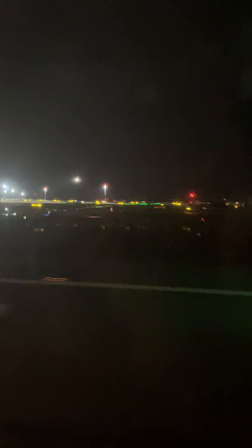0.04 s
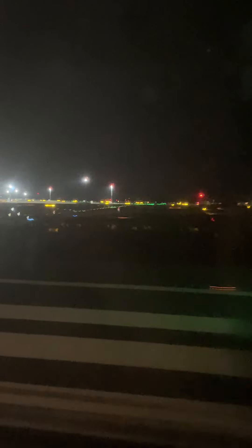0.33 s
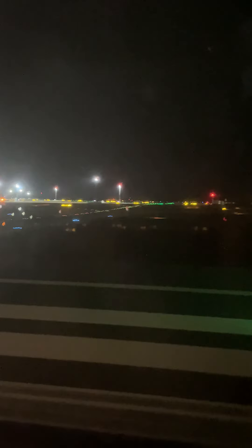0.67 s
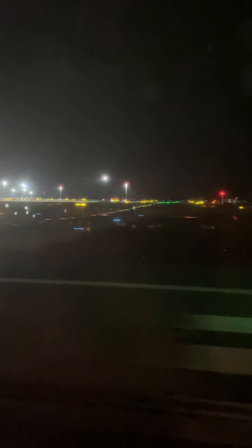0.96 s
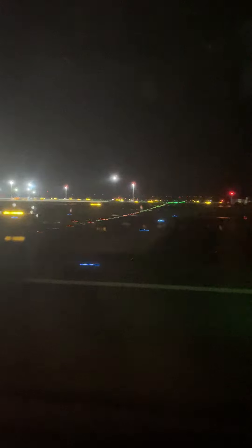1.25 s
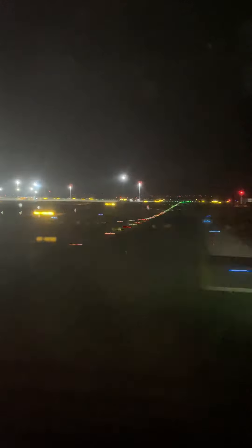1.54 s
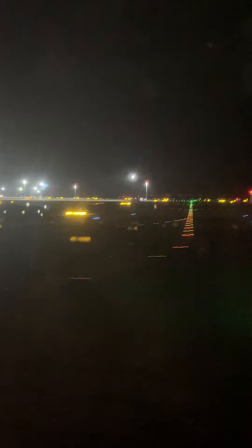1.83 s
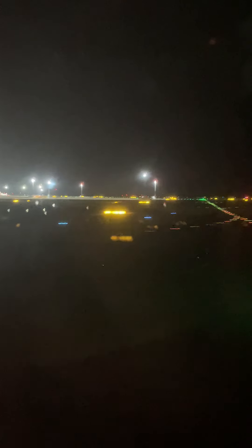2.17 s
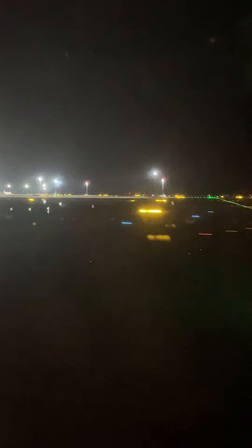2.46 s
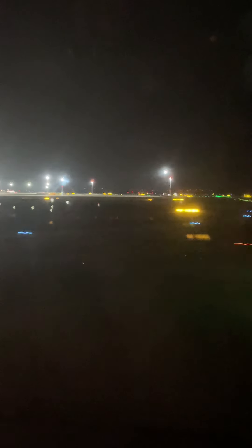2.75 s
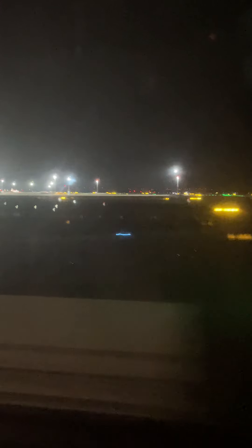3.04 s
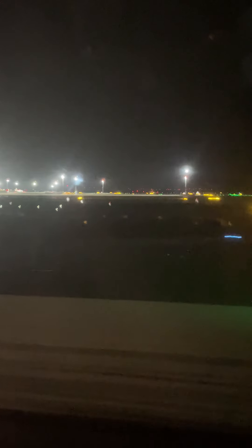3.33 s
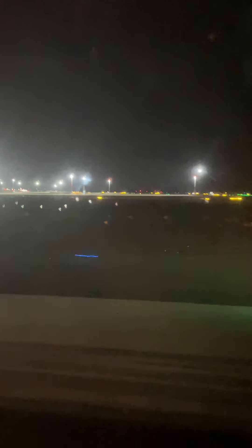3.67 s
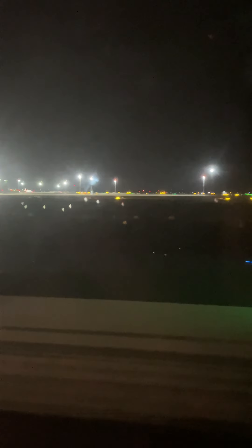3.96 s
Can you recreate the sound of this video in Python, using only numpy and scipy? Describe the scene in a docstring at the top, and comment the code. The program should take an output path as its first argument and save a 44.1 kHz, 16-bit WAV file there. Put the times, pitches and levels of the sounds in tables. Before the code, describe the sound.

Jet engines roar at takeoff power with a steady, gently beating buzz, heard from a window seat inside the cabin. Underneath, the wheels rumble and drone along the runway, while plastic trim rattles faintly a few times.

```python
"""Takeoff roll from a window seat.

Inside a jet gathering speed on the runway at takeoff thrust, a microphone at each ear. Two fans,
slightly out of step, draw a beating buzz-saw chord on the multiples of their shaft rate. Below the
seat the wheels drone on a slowly rising pitch and the undercarriage rumbles. The cabin trim rattles
briefly; behind it all lie the roar of the exhaust and the hiss of the cabin air."""
import sys
import numpy as np
from scipy import signal
from scipy.fft import rfft, irfft
from scipy.io import wavfile
from scipy.ndimage import uniform_filter1d, minimum_filter1d

SR = 44100
rng = np.random.default_rng(int(sys.argv[2]) if len(sys.argv) > 2 else 0)


def materialize(psi):
    """Save the field psi as 16-bit PCM at rate SR to the path in sys.argv[1].

    A 1-D psi becomes a single channel; in a 2-D psi each row is a channel.
    """
    bounded = np.clip(np.atleast_2d(psi).T, -1, 1)
    quanta = np.round(bounded * 32767).astype(np.int16)
    wavfile.write(sys.argv[1], SR, quanta)


N = 176400

# Buzz-saw tones at the seat. Each row: multiple of the shaft rate, relative level at mid-roll in dB
# on the left, the same on the right, growth in dB per second.
BUZZ_SAW_TONES = [(3, -29.5, -30.5, 0), (4, -18.0, -22.0, 0), (5, -39.0, -47.5, 0), (6, -30.0, -34.0, 0),
                  (7, -28.0, -32.0, 0), (8, -54.5, -45.5, 0), (9, -40.0, -39.0, 0), (10, -32.0, -38.0, 0),
                  (11, -40.5, -41.0, 0), (12, -50.0, -51.0, 0.3), (13, -45.0, -52.0, 0.3),
                  (14, -36.5, -40.5, 0), (15, -49.0, -47.5, 0), (16, -46.0, -49.0, 0.9),
                  (17, -48.5, -46.0, -1.6), (18, -49.5, -47.5, 0), (19, -53.0, -49.5, 0.4),
                  (20, -42.0, -43.5, 0), (21, -42.0, -44.5, 0.5), (22, -57.0, -51.5, -1.0),
                  (23, -58.5, -50.0, 1.0), (24, -49.0, -47.0, 0), (25, -58.5, -55.0, 0.9),
                  (26, -53.5, -51.0, 0.7), (27, -56.5, -56.5, -1.5), (28, -63.0, -61.5, 0),
                  (29, -47.5, -47.0, 1.5), (30, -41.0, -56.0, 1.0), (31, -52.0, -59.0, 3.5),
                  (32, -54.5, -57.0, 1.1), (33, -61.5, -59.0, -1.4), (34, -57.0, -59.5, 2.5),
                  (35, -48.5, -50.5, -1.1), (36, -40.5, -39.5, -0.5), (37, -56.5, -59.0, -1.9),
                  (38, -57.0, -64.0, 1.4), (39, -54.0, -59.0, 2.4), (40, -57.5, -58.0, 1.0),
                  (41, -55.0, -60.0, -1.0), (42, -54.5, -56.0, 0), (43, -63.0, -64.5, 1.6),
                  (44, -57.0, -62.5, -2.0), (45, -56.0, -59.5, -0.9), (46, -59.0, -66.5, -2.0),
                  (47, -64.0, -62.0, -2.2), (49, -69.5, -68.5, -2.3), (50, -63.0, -66.5, 2.1),
                  (51, -65.5, -66.0, -0.5), (52, -73.0, -68.5, 2.5), (53, -66.5, -68.5, 1.8),
                  (55, -68.0, -66.0, 0), (56, -63.5, -64.0, -1.1)]
# The far engine. Each row: multiple of the shaft rate, level against the near engine in dB.
FAR_ENGINE = [(1, -12), (4, -7), (6, -2.5), (7, -22), (14, -18), (20, -12), (21, -8), (24, -17), (30, -19),
              (35, -10), (36, -18), (39, -8), (45, -13)]
# Fan tones across the two microphones. Each row: frequency in Hz, lead of the left in radians.
FAN_LEAD = [(70, -.5), (280, -.16), (450, 1.5), (1000, 1.2), (1150, -.3), (1280, .8), (1550, 1.1),
            (1700, 0), (2030, -1.3), (2100, .2), (2230, -.8), (2520, 1.2), (3200, 1.3), (4000, 1)]
# Three fan whines swell and ease. Each row: time in seconds, gain in dB.
SWELL_30TH = [(0, -1), (.6, -2), (1.2, .5), (2, .5), (3, -.5), (4, -2)]
SWELL_36TH = [(0, -1.5), (.9, -.7), (1.3, 1.2), (2, 0), (2.55, 2), (2.9, -1), (3.35, -1.5), (3.6, .5),
              (3.72, -2.5), (4, -1.5)]
SWELL_50TH = [(0, 0), (1.2, 2), (2.5, -7), (2.9, -1), (3.5, 2.5), (4, 2)]
# Turbulence makes tones fade and return, the weak ones most. Each row: tone level in dB, depth 0-1.
TURBULENT_FADING = [(-60, .4), (-48, .2), (-40, .08)]
# Engine hum. Each row: frequency in Hz, level in dB.
HUM_TONES = [(194, -21.5), (632, -46)]
# Drone on three multiples of the wheel rate. Each row: time in seconds, level in dB.
WHEEL_4TH = [(0, -27), (.3, -24), (.45, -15), (.8, -14.5), (1.3, -11.7), (1.8, -12.3), (2.15, -26),
             (2.45, -16), (2.8, -20), (3.3, -13), (3.65, -17.5), (4, -25)]
WHEEL_5TH = [(0, -37), (.3, -15), (.7, -27), (1.8, -25.5), (2.3, -18.5), (3.0, -27), (3.6, -26.5),
             (3.9, -9.5)]
WHEEL_7TH = [(0, -25), (.8, -21.5), (1.5, -29.5), (2.25, -21), (3.0, -27.5), (4, -21)]
# Trim rattles. Each row: start in seconds, level in dB, decay in seconds, brightness in dB per octave.
RATTLES = [(.824, -55, .005, 6), (1.364, -42, 0.016, 2), (1.377, -41, .012, -14), (1.386, -49, .007, -5),
           (3.423, -43, 0.0032, 2), (3.577, -47, 0.016, -17.5)]
# Spectra of the trim, undercarriage, exhaust through the fuselage and cabin air.
# Each row: frequency in Hz, relative noise density in dB.
RATTLE_SPECTRUM = [(1500, -7.5), (2800, 6), (5000, 8), (7300, 3), (9500, -2), (12000, -2), (15000, -14)]
RUMBLE_SPECTRUM = [(18, -60), (30, -50.5), (42, -34.5), (60, -38.5), (85, -34), (115, -36.5), (135, -39.5),
                   (175, -37.5), (212, -35.5), (250, -41), (278, -40)]
EXHAUST_SPECTRUM = [(310, -44), (380, -47.5), (460, -52), (505, -53), (530, -43.5), (570, -57.5),
                    (680, -55), (850, -60.5), (1100, -67.5), (1500, -70.5), (1900, -77.5), (2100, -74),
                    (2300, -76.5), (2520, -75), (2650, -79), (3200, -83.5)]
AIR_SPECTRUM = [(3900, -87.5), (4400, -87.5), (5000, -87.5), (5800, -96), (7200, -89), (8500, -105.5),
                (11500, -97.5), (13000, -109), (15500, -115)]
# The cabin's sound field at the microphones. Each row: frequency in Hz, left minus right in dB,
# coherence 0-1, lead of the left in radians.
CABIN_FIELD = [(50, -2.8, .99, -.04), (80, -2.2, .92, .18), (120, -1.2, .87, .3), (250, 1.8, .82, .05),
               (400, 1.5, .5, .25), (550, .6, .35, 1.2), (900, .6, .5, .8), (1500, 0, .33, .2),
               (2500, .8, .38, 0), (4500, .3, .08, -1.0), (6500, 1.0, .3, -1.7), (8500, .5, .5, -2.0),
               (11000, 0, .7, -.3)]


def fans():
    """Shock waves from unequal blades repeat once a turn; two engines beat, faster on higher multiples."""
    shaft_hz, wander_hz, mismatch_hz = 70.0, .012, .215
    in_step_s, mid_roll_s = 1.42, 2.0
    turns = np.cumsum(shaft_hz + wander_hz * drift(.51)) / SR
    slip_turns = mismatch_hz * (seconds() - in_step_s)  # the far engine turns slightly faster
    swells = {30: SWELL_30TH, 36: SWELL_36TH, 50: SWELL_50TH}
    # Faint upper multiples fall away by .22 dB each, scattered by 2 dB on either side.
    faint_tones = [(k, *(-71.5 - .22 * (k - 59) + rng.normal(0, 2.0, 2)), 0) for k in range(59, 96)]
    out = np.zeros((2, N))
    for multiple, left_db, right_db, db_per_s in list(BUZZ_SAW_TONES) + faint_tones:
        k = round(multiple)
        far_gain = from_db(np.interp(k, *np.transpose(FAR_ENGINE)))
        beat = (1 + far_gain * np.exp(2j * np.pi * k * slip_turns)) / np.sqrt(1 + far_gain ** 2)
        swell_db = db_per_s * (seconds() - mid_roll_s) + (in_time(swells[k]) if k in swells else 0)
        fade_depth = np.interp(max(left_db, right_db), *np.transpose(TURBULENT_FADING))
        fade = tone(0, flutter=fade_depth, rate_hz=1.6) / np.sqrt(2)
        wave = from_db(swell_db) * beat * fade * tone(k * turns, flutter=.11, rate_hz=9.0)
        lead = at_hz(FAN_LEAD, k * shaft_hz)[0]
        out[0] += from_db(left_db) * np.real(wave * np.exp(1j * lead))
        out[1] += from_db(right_db) * wave.real
    return from_db(-.06) * out


def engine_hum():
    """The engine's other turning parts hold their pitch and flutter in strength."""
    return sum(from_db(db) * at_microphones(tone(hz * seconds(), flutter=.73, rate_hz=11.0), hz)
               for hz, db in HUM_TONES)


def wheels():
    """Under the floor, uneven tyres drone on multiples of the wheel rate, which rises with speed."""
    start_hz, rise_hz_per_s = 13.75, 1.03
    turns = np.cumsum(start_hz + rise_hz_per_s * seconds()) / SR
    out = np.zeros((2, N))
    for k, levels in (4, WHEEL_4TH), (5, WHEEL_5TH), (7, WHEEL_7TH):
        drone = tone(k * turns, flutter=.07, rate_hz=2.5)
        out += from_db(in_time(levels)) * at_microphones(drone, k * start_hz)
    return out


def trim_rattles():
    """Loose plastic in the cabin chatters: short, grainy bursts, some bright and some dull."""
    attack_s, grain_db = .0022, 2.5
    hz = np.fft.rfftfreq(N, 1 / SR)
    octaves = np.log2(np.maximum(hz, RATTLE_SPECTRUM[0][0]))
    out = np.zeros((2, N))
    octaves = np.maximum(octaves, np.log2(RATTLE_SPECTRUM[1][0]))  # brightness tilts only the treble
    for start, db, decay_s, brightness in RATTLES:
        age = np.maximum(seconds() - start, 0)
        envelope = from_db(db) * np.minimum(age / attack_s, 1) * np.exp(-age / decay_s)
        colour = from_db(at_hz(RATTLE_SPECTRUM, hz)[0] + brightness * octaves)
        noise = irfft(rfft(rng.standard_normal((2, N))) * colour, N)
        noise = noise + .5 * noise[::-1]  # each side spills into the other microphone
        out += envelope * noise / noise.std()
    return out * from_db(grain_db * drift(200))


def rumble_roar_and_air():
    """The bed of the scene: undercarriage in the bass, exhaust in the middle, flickering air on top."""
    spectrum = list(RUMBLE_SPECTRUM) + list(EXHAUST_SPECTRUM) + list(AIR_SPECTRUM)
    rumble_top_hz, roar_top_hz, flicker_db = 290, 3600, .86
    rumble = from_db(2.5) * cabin_noise(spectrum, 12, rumble_top_hz)
    roar = from_db(-.5) * cabin_noise(spectrum, rumble_top_hz, roar_top_hz)
    air = from_db(-2 + flicker_db * drift(8)) * cabin_noise(spectrum, roar_top_hz, SR / 2)
    return rumble + roar + air


def cabin_noise(spectrum, low_hz, high_hz):
    """A band of noise, alike at both microphones in the bass and more diffuse above."""
    hz = np.fft.rfftfreq(N, 1 / SR)
    tilt_db, coherence, lead = at_hz(CABIN_FIELD, hz)
    shared, separate = rfft(rng.standard_normal((2, N)))
    left = shared * np.exp(1j * lead) * from_db(tilt_db / 2)
    right = (coherence * shared + np.sqrt(1 - coherence ** 2) * separate) * from_db(-tilt_db / 2)
    in_band = (hz >= low_hz) & (hz < high_hz)
    gain = from_db(at_hz(spectrum, hz)[0]) * np.sqrt(SR / 2) * in_band
    return irfft(gain * np.array([left, right]), N)


def at_microphones(wave, hz):
    """A complex tone in the cabin reaches each microphone with its own level and phase."""
    tilt_db, _, lead = at_hz(CABIN_FIELD, hz)
    return np.real([wave * from_db(tilt_db / 2) * np.exp(1j * lead), wave * from_db(-tilt_db / 2)])


def tone(turns, flutter, rate_hz):
    """A complex tone whose strength and phase flutter; its real part has an rms near 1."""
    sway = (1 + flutter * (drift(rate_hz) + 1j * drift(rate_hz))) / np.sqrt(.5 + flutter ** 2)
    return sway * np.exp(2j * np.pi * (turns + rng.random()))


def drift(rate_hz):
    """Smooth random motion with a spread of 1, mostly slower than rate_hz."""
    hop, settling_steps = 40, 2000
    pole = np.exp(-2 * np.pi * rate_hz * hop / SR)
    noise = rng.standard_normal(N // hop + settling_steps + 2)
    slow = signal.lfilter([1], [1, -2 * pole, pole * pole], noise)[settling_steps:]
    return np.interp(np.arange(N) / hop, np.arange(len(slow)), slow / slow.std())


def at_hz(rows, hz):
    """The columns of a table, read on a log-frequency axis."""
    knots, *columns = np.transpose(rows)
    return [np.interp(np.log(np.maximum(hz, 1)), np.log(knots), column) for column in columns]


def in_time(rows):
    """A control curve at every sample."""
    return np.interp(seconds(), *np.transpose(rows))


def seconds():
    """Time of every sample."""
    return np.arange(N) / SR


def from_db(db):
    """Decibels to gain."""
    return 10 ** (np.asarray(db) / 20)


def scene():
    """Everything that reaches the window seat."""
    return fans() + engine_hum() + wheels() + trim_rattles() + rumble_roar_and_air()


def record(dry):
    """Behind the microphones, a look-ahead limiter ducks the bass on peaks; the top treble is cut."""
    ceiling, release_db_per_s, bass_hz, cutoff_hz = .9, 181.5, 500, 15700
    over_db = 20 * np.log10(np.maximum(np.abs(dry).max(axis=0) / ceiling, 1))
    release_ramp = release_db_per_s * seconds()
    gain_db = release_ramp - np.maximum.accumulate(over_db + release_ramp)
    held_db = minimum_filter1d(gain_db, size=301)  # starts the dip ahead of the peak
    smooth_db = uniform_filter1d(uniform_filter1d(held_db, size=151), size=151)
    bass = signal.sosfiltfilt(signal.butter(2, bass_hz, fs=SR, output="sos"), dry)
    limited = dry + bass * (from_db(smooth_db) - 1)
    return signal.sosfilt(signal.cheby2(12, 70, cutoff_hz, fs=SR, output="sos"), limited)


dry = scene()
out = record(dry)
materialize(out)
```